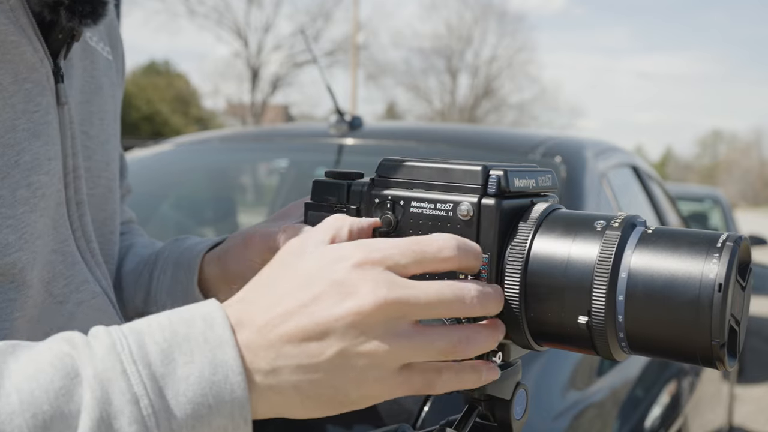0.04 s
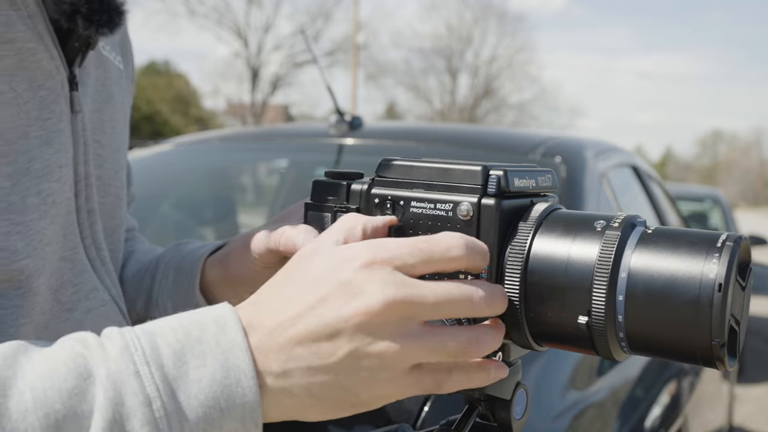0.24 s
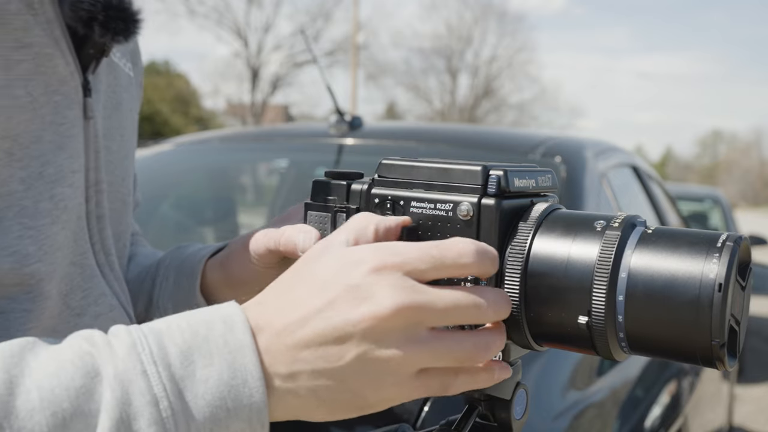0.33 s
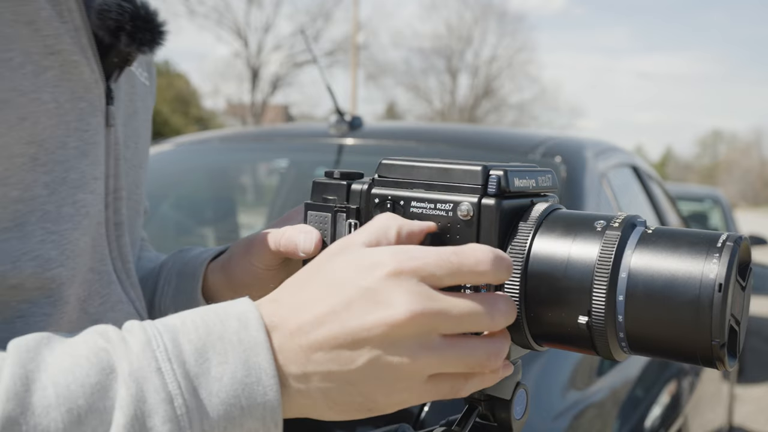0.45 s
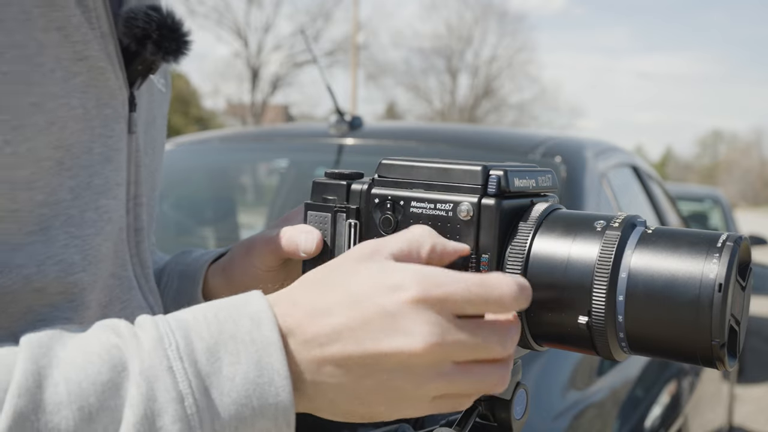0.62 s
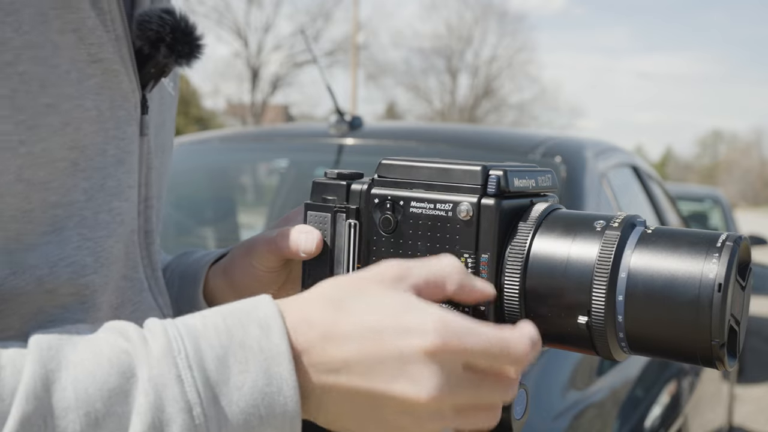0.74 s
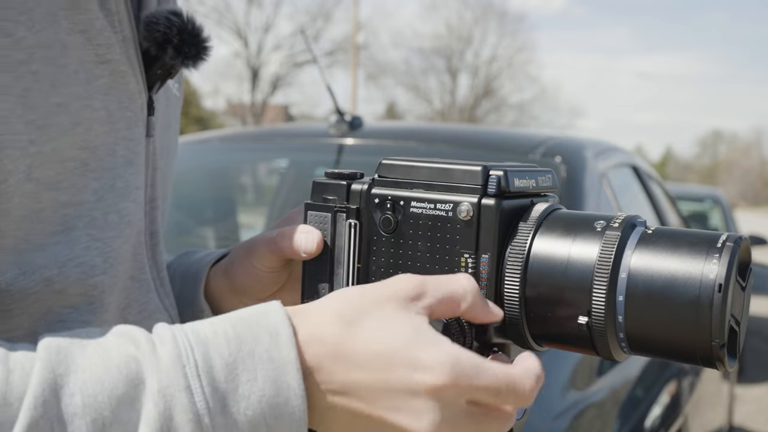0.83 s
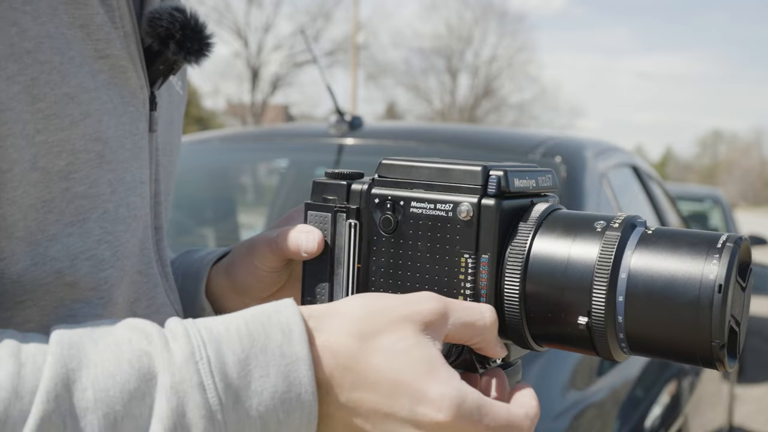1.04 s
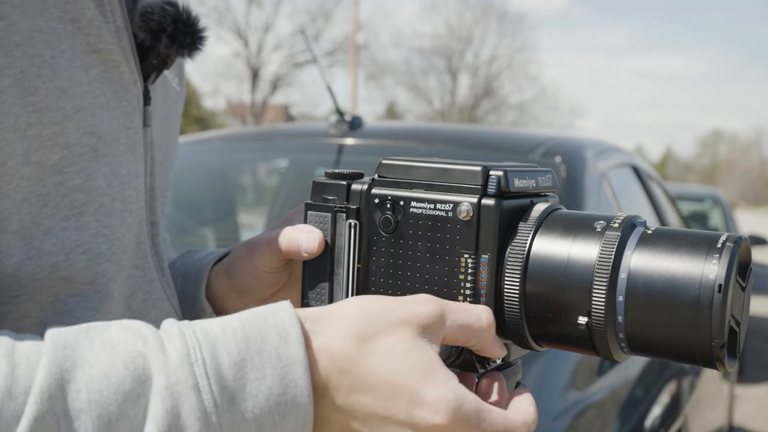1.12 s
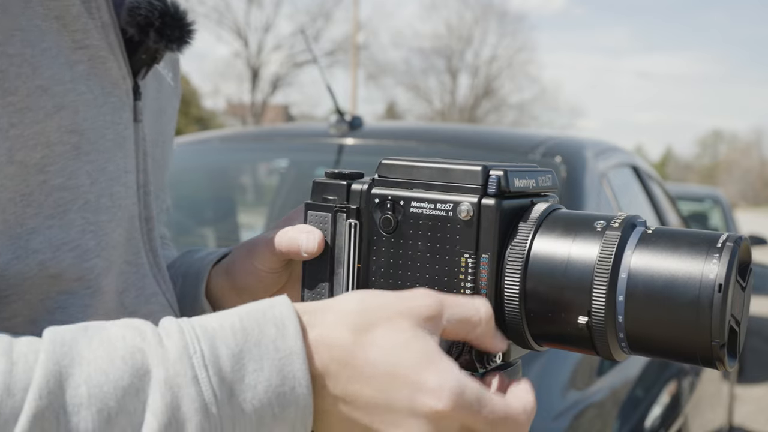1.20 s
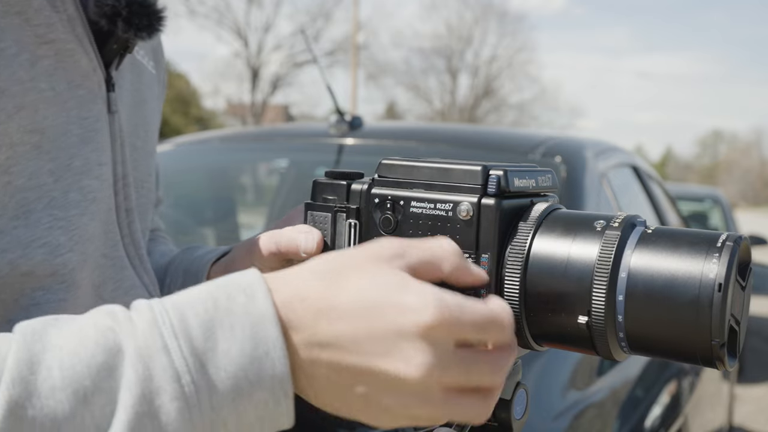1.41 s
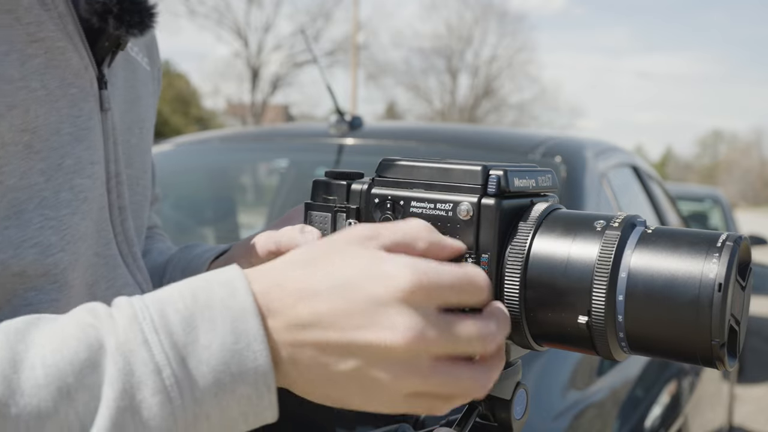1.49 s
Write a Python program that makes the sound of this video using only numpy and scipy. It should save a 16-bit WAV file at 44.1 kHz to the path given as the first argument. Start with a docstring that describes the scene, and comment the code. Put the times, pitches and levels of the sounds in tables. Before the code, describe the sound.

Ratcheting whirr of a large film camera being wound, followed by a few light ticks.

```python
"""Winding a large film camera

Close by, over faint outdoor air, a hand pushes the advance lever down in two goes. A pawl (a small
catch) ticks over a toothed wheel, faster as the lever speeds up. Gears grind in the case, latches snap
in and the lever meets its stop. Then it swings back with a short rub and a few light ticks."""
import sys
import numpy as np
from scipy import signal
from scipy.fft import rfft, irfft
from scipy.io import wavfile

SR = 44100
rng = np.random.default_rng(int(sys.argv[2]) if len(sys.argv) > 2 else 0)


def persist_wave(psi):
    """Save psi, clipped to +-1, as 16-bit WAV."""
    counts = np.round(np.clip(psi, -1, 1) * 32767).astype(np.int16)
    wavfile.write(sys.argv[1], SR, np.atleast_2d(counts).T)


N = 68355
T = np.arange(N) / SR

# knocks of the lever and its links (time [s], metal level [dB], thud level [dB], thud pitch [Hz])
LEVER_KNOCKS = [(0.035, -47.5, -56, 1220), (.084, -52, -46.5, 533), (.128, -56, -43, 955),
                (.147, -46, -47.5, 980), (.1745, -43, -57.5, 675), (.183, -35, -47.5, 724),
                (0.2912, -36, -51, 610), (.308, -37, -59, 590), (.458, -25, -37.5, 666),
                (0.4885, -24.5, -38.5, 496), (0.787, -31, -34, 503), (0.8872, -19.5, -36, 425),
                (.997, -42, -34, 610), (1.0115, -19, -39, 640), (1.0332, -26.5, -26, 862),
                (1.0388, -28, -42, 630), (1.0669, -36, -48, 1080), (1.301, -37.5, -47, 594),
                (1.324, -40.5, -49, 328), (1.329, -37, -52.5, 590), (1.341, -38, -50.5, 330),
                (1.396, -46, -44, 800), (1.406, -33.5, -41.5, 340)]
# latches snapping in (time [s], snap level [dB], thud level [dB], thud pitch [Hz])
LATCH_SNAPS = [(0.4007, -12.5, -25.5, 556), (0.5673, -11.5, -40, 863), (0.604, -21, -57, 600),
               (.607, -17, -33, 498)]


def from_db(db):
    """Turn decibels into a number to multiply a sound by."""
    return 10 ** (np.asarray(db) / 20)


def levels(rows):
    """Join the points of each decibel column into a gain that changes over time."""
    times, *columns = np.transpose(rows)
    return [from_db(np.interp(T, times, column)) for column in columns]


def resonate(x, tones, sign=-1):
    """A shaken part rings at its own tones; sign=1 leaves deeper valleys between them."""
    out = np.zeros(N)
    for k, (hz, width, db) in enumerate(tones):
        r = np.exp(-np.pi * width / SR)  # a narrower tone rings longer
        feedback = [1, -2 * r * np.cos(2 * np.pi * hz / SR), r * r]
        gain = sign ** k * from_db(db) * (1 - r * r) / 2
        out += gain * signal.lfilter([1, 0, -1], feedback, x + 1e-18)
    return out


def contacts(times, dbs, hold_s, decay_s):
    """Parts chatter as they meet: each burst of noise rises quickly, holds and dies away."""
    attack_s = 0.00065
    power = np.zeros(N)
    for s, db in zip(times, dbs):
        start = int(s * SR)
        age = T[:max(0, min(N - start, SR // 20))]
        rise = np.minimum(age / attack_s, 1)
        fade = np.exp(-np.maximum(age - hold_s, 0) / decay_s)
        power[start:start + len(age)] += (from_db(db) * rise * fade) ** 2
    return np.sqrt(power) * rng.standard_normal(N)


def grains(per_second=4200, spread_db=4):
    """Grinding and rubbing are made of many tiny hits of uneven size."""
    hits = (rng.random(N) < per_second / SR) * rng.choice([-1, 1], N)
    hits = hits * from_db(spread_db * np.minimum(rng.exponential(1, N), 4))
    return hits / np.std(hits)


def impacts(times, dbs, feedback=.55):
    """Clean clicks, each smeared by echoes along four short paths through the metal."""
    x = np.zeros(N)
    x[(times * SR).astype(int)] = from_db(dbs)
    for path_s in [.00009, .00016, .00025, .00037]:
        echo = np.r_[1, np.zeros(int(path_s * SR)), feedback]
        x = signal.lfilter(echo[::-1], echo, x + 1e-18)
    return x


def air(gain_db=-45):
    """Outdoor air makes a steady, dull hush."""
    # tone of the hush, from low to high (frequency [Hz], relative level [dB])
    hush = [(20, -21), (45, -16.5), (75, -6), (130, -4), (250, -2), (500, -7), (950, -10.5), (1600, -22.5),
            (4500, -26), (9000, -28), (16000, -34)]
    hz, db = np.transpose(hush)
    log_hz = np.log(np.fft.rfftfreq(N, 1 / SR) + 1)
    gain = from_db(gain_db + np.interp(log_hz, np.log(hz), db))
    return irfft(rfft(rng.standard_normal(N)) * gain, N)


def gear_train():
    """Grinding and knocks shake the gears, the springs and the hollow case."""
    # how hard the gears work (time [s], grinding level [dB], case rumble level [dB])
    gear_load = [(0, -83, -54), (.16, -61.5, -48.5), (.19, -59, -42.5), (.28, -52, -39), (.38, -44, -34),
                 (.42, -34, -33), (.44, -43, -28.5), (.46, -44, -25), (.52, -30.5, -29.5),
                 (.55, -40.5, -28.5), (.62, -30.5, -26.5), (.68, -37.5, -33), (.73, -38, -32),
                 (.78, -27, -24.5), (.893, -34, -24.5), (.903, -44, -42), (.935, -44.5, -30.5),
                 (.96, -35.5, -27), (1.005, -25.5, -20.5), (1.025, -37.5, -28), (1.042, -29, -22.5),
                 (1.05, -51.5, -46), (1.1, -74, -78)]
    # ringing tones of the gears (pitch [Hz], width [Hz], level [dB])
    gear_tones = [(2137, 300, -2), (2565, 130, 1), (2866, 290, -1.5), (3320, 360, -1.5), (4090, 390, -0.5),
                  (4790, 370, 0), (5416, 205, 3.5), (7020, 250, -2.5), (7650, 310, -3.5), (9400, 1100, -8),
                  (11000, 710, -8.5), (14000, 1400, -12.5)]
    # long-ringing tones of the springs (pitch [Hz], width [Hz], level [dB])
    spring_tones = [(1129, 44, -5.5), (2240, 18, -7), (2740, 18, -19), (3520, 8.5, -11), (4027, 11, -5),
                    (4150, 8.8, -7), (4270, 12, -3), (4600, 18, -5), (4930, 16, -17), (5430, 22, -18),
                    (6800, 25, -27), (7900, 17, -19)]
    # low tones of the hollow case (pitch [Hz], width [Hz], level [dB])
    case_tones = [(312.7, 52, -6.5), (473.5, 87, -2), (590, 87, 4.5), (630, 85, 4.5), (755, 183, -6),
                  (935, 130, -2.5), (1137, 82, -2), (1293, 189, -5.5)]
    grind, rumble = levels(gear_load)
    times, metal_db, _, _ = np.transpose(LEVER_KNOCKS)
    metal = grind * grains() + contacts(times, metal_db, hold_s=0.0013, decay_s=0.0024)
    times, _, thud_db, _ = np.transpose(LEVER_KNOCKS + LATCH_SNAPS)
    shake = rumble * grains() + contacts(times, thud_db + 8, hold_s=0.0027, decay_s=0.0047)
    case_band = signal.butter(2, [237, 1600], "band", fs=SR, output="sos")
    case = signal.sosfilt(case_band, resonate(shake, case_tones))
    return resonate(metal, gear_tones) + resonate(metal, spring_tones) + case


def thuds(rise_s=0.0019, decay_s=0.0031):
    """Every knock and latch gives a short hollow thud, pitched by where it lands in the case."""
    out = np.zeros(N)
    for s, _, db, hz in LEVER_KNOCKS + LATCH_SNAPS:
        age = np.maximum(T - s, 0)
        envelope = (1 - np.exp(-age / rise_s)) * np.exp(-age / decay_s)
        out += 2 * from_db(db) * envelope * np.sin(2 * np.pi * hz * age)
    return out


def tooth_times(push):
    """A tooth passes whenever the wheel has turned one more step."""
    times, speed = np.transpose(push)
    t = T[(T >= times[0]) & (T <= times[-1])]
    teeth_passed = np.cumsum(np.interp(t, times, speed)) / SR
    return np.interp(np.arange(int(teeth_passed[-1]) + 1), teeth_passed, t)


def ratchet():
    """The pawl drops off each tooth with a crack, chatters a little and sets the wheel ringing."""
    # one tooth slips over before each push (time [s])
    lone_teeth = [.1462, .9228]
    # the wheel turning in the long first push (time [s], speed [teeth per s])
    long_push = [(0.1815, 42.3), (0.2628, 79.8), (0.2903, 44.1), (0.3146, 70.5), (0.3363, 115.6),
                 (0.3731, 75.5), (0.4134, 175.8), (0.4258, 117.8), (0.4428, 174.8), (0.4648, 151.0),
                 (0.4888, 181.5), (0.4938, 131.2), (0.5288, 89.8), (0.5758, 199.8), (0.6078, 194.0),
                 (0.6148, 107.8), (0.6248, 176.4), (0.6863, 119.0), (0.6908, 153.7), (0.7178, 118.2),
                 (0.8278, 324.7), (0.8954, 233.0)]
    # the wheel turning in the short last push (time [s], speed [teeth per s])
    last_push = [(0.9413, 132.8), (0.973, 181.2), (1.0012, 335.3), (1.0282, 151.9), (1.0403, 238.1)]
    # how hard the pawl drops (time [s], ring level [dB], crack level [dB])
    pawl_force = [(.15, -36, -33), (.2, -34, -30), (.37, -27, -31.5), (.45, -24.5, -29),
                  (.55, -26.5, -30.5), (.6, -23.5, -30), (.72, -22.5, -32), (.79, -23, -40),
                  (.89, -20.5, -34), (.92, -24.5, -33), (.96, -21, -34), (1.04, -22, -44)]
    # ringing tones of the pawl and wheel (pitch [Hz], width [Hz], level [dB])
    pawl_tones = [(2220, 380, -11.5), (2810, 500, -12), (4060, 230, -23), (4980, 270, -6.5),
                  (5330, 190, -2.5), (6750, 270, -5), (7800, 340, -6), (9400, 240, -1.5), (9640, 190, 0.5),
                  (11320, 410, 1.5), (13200, 420, -5), (13400, 330, -10), (13900, 400, -20)]
    # tones in the dry crack of the pawl's tip (pitch [Hz], width [Hz], level [dB])
    crack_tones = [(2920, 1800, -3), (4540, 610, 0), (6680, 200, 5.5), (8970, 650, 2.5),
                   (10700, 2000, -0.5), (14200, 2200, -5)]
    times = np.concatenate([lone_teeth, tooth_times(long_push), tooth_times(last_push)])
    uneven_db = 0.4 * rng.standard_normal(len(times))
    ring_gain, crack_gain = levels(pawl_force)
    drops = impacts(times, uneven_db + 15.5)
    chatter = contacts(times, uneven_db - 10, hold_s=0.0018, decay_s=0.0016)
    cracks = contacts(times, uneven_db - 6, hold_s=0.0017, decay_s=0.0028)
    ring = resonate(ring_gain * (drops + chatter), pawl_tones, sign=1)
    return ring + resonate(crack_gain * cracks, crack_tones)


def latches():
    """Latches drop into place with bright snaps."""
    # ringing tones of a latch (pitch [Hz], width [Hz], level [dB])
    latch_tones = [(3180, 220, -8), (4430, 290, -2), (6400, 310, -0.5), (6950, 320, -1), (8800, 390, -2.5),
                   (10900, 910, -7), (14100, 1000, -8)]
    times, db, _, _ = np.transpose(LATCH_SNAPS)
    return resonate(contacts(times, db, hold_s=.0014, decay_s=.0011), latch_tones)


def spring_pings(pitch_hz=1128, rise_s=0.0019, decay_s=0.018):
    """Near the end of its travel the lever sets a low spring pinging."""
    # hits on the spring (time [s], level [dB])
    pings = [(0.916, -42.5), (1.01, -36.5), (1.037, -44.5)]
    envelope = np.zeros(N)
    for s, db in pings:
        age = np.maximum(T - s, 0)
        envelope += from_db(db) * np.minimum(age / rise_s, 1) * np.exp(-age / decay_s)
    return envelope * np.sin(2 * np.pi * pitch_hz * T)


def lever_return():
    """The lever clicks free of its stop, rubs as it swings back and ticks lightly as it comes home."""
    # tones of the click (pitch [Hz], width [Hz], level [dB])
    click_tones = [(2430, 530, 11.5), (3100, 230, 1), (4100, 300, -6), (5470, 320, 0), (7500, 530, -3),
                   (10600, 2300, -9), (14900, 1900, -5)]
    # how hard the lever rubs (time [s], level [dB])
    rub_force = [(1.27, -85), (1.29, -48.5), (1.335, -61), (1.365, -54.5), (1.388, -35), (1.402, -46),
                 (1.418, -45), (1.432, -56.5), (1.46, -84), (1.55, -58)]
    # tones of the rub (pitch [Hz], width [Hz], level [dB])
    rub_tones = [(570, 330, 3), (3250, 280, 3), (4170, 450, 1), (5200, 280, -2.5), (6820, 210, 2),
                 (9000, 1400, -8), (12700, 2400, -10)]
    # the light ticks (time [s], level [dB])
    tick_hits = [(1.376, -43), (1.387, -41.5), (1.416, -46), (1.4405, -41.5), (1.4807, -39), (1.4878, -42),
                 (1.5066, -41), (1.5197, -45), (1.5413, -39.5)]
    # tones of the ticks (pitch [Hz], width [Hz], level [dB])
    tick_tones = [(3410, 215, 7), (4170, 500, -4.5), (6630, 500, 9), (7100, 420, 5.5), (9400, 3000, -9.5),
                  (11800, 1500, -16)]
    click = resonate(contacts(times=[1.2825], dbs=[-41], hold_s=.003, decay_s=0.0016), click_tones)
    rub_gain, = levels(rub_force)
    rub = resonate(rub_gain * grains(), rub_tones)
    times, db = np.transpose(tick_hits)
    ticks = resonate(contacts(times, db, hold_s=0.0022, decay_s=.0015), tick_tones)
    return click + rub + ticks


def scene():
    """The camera, close by and with no room echo, in the open air."""
    camera = ratchet() + gear_train() + thuds() + spring_pings() + latches() + lever_return()
    case_dip = signal.iirnotch(1776, Q=6.6, fs=SR)  # the case gives off little sound at this pitch
    return (signal.lfilter(*case_dip, camera) + air())[None]


def record(dry):
    """The very highest treble is cut off steeply."""
    cutoff_hz = 15650
    return signal.sosfilt(signal.ellip(10, .2, 80, cutoff_hz, fs=SR, output="sos"), dry)


dry = scene()
out = record(dry)
persist_wave(out)
```